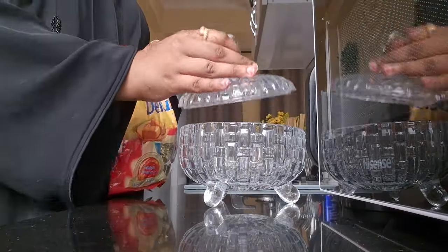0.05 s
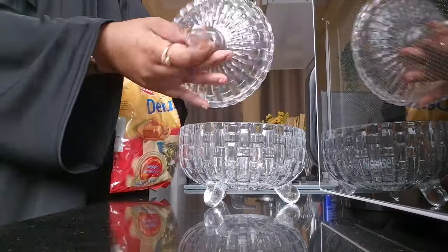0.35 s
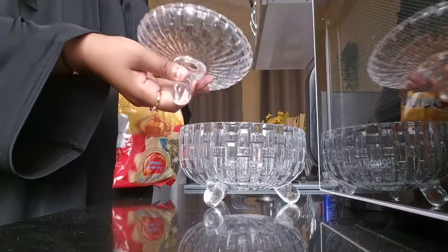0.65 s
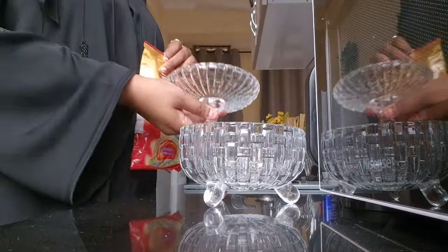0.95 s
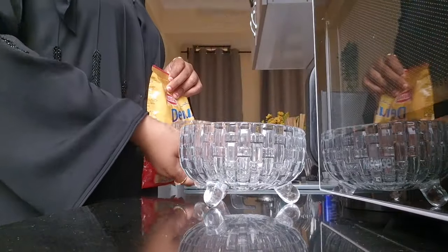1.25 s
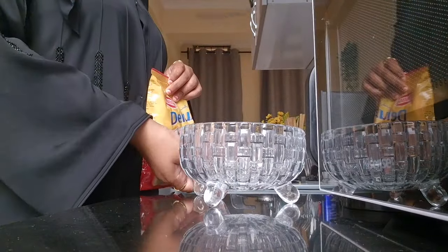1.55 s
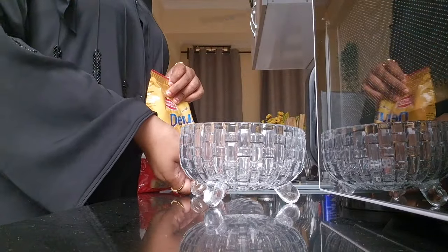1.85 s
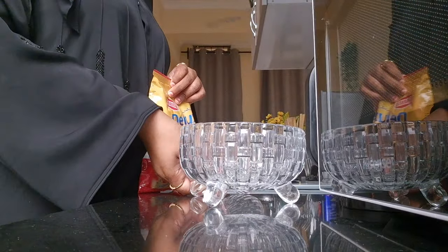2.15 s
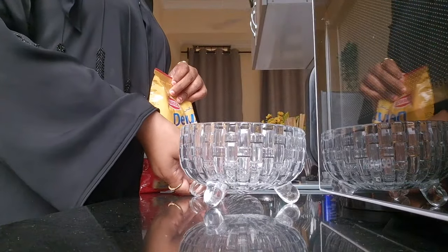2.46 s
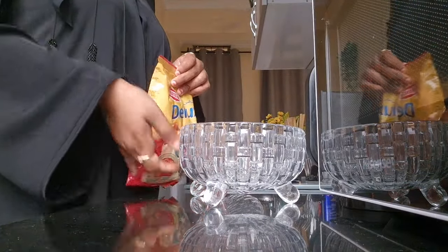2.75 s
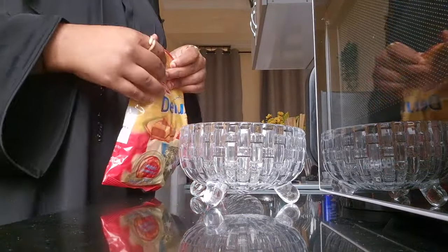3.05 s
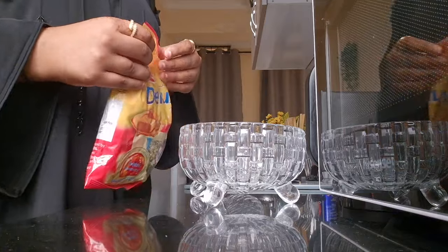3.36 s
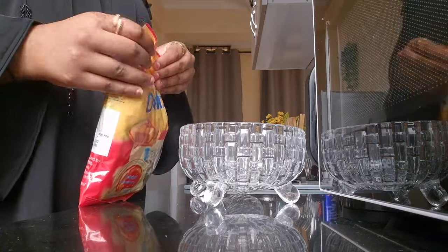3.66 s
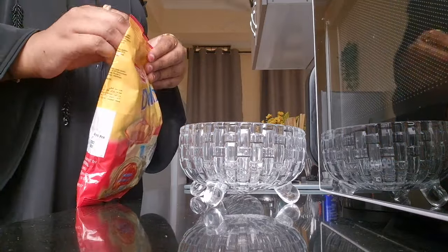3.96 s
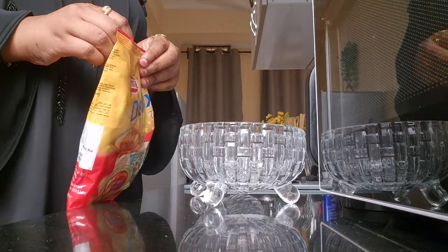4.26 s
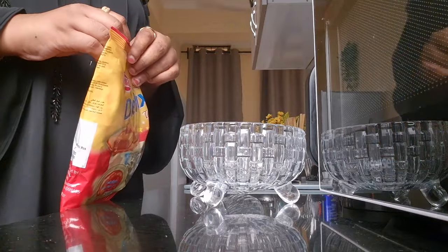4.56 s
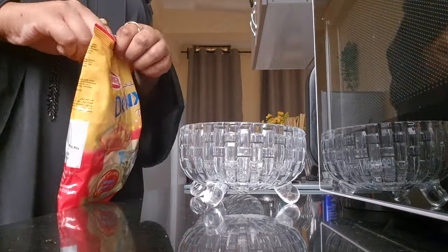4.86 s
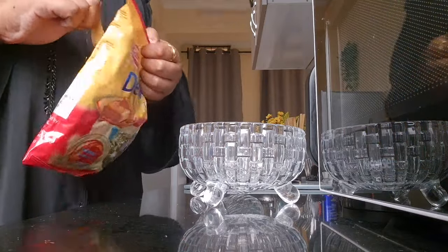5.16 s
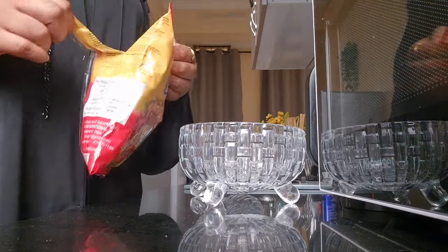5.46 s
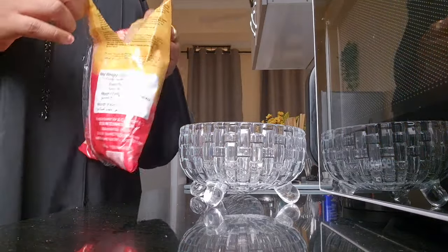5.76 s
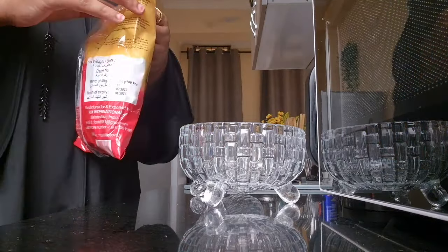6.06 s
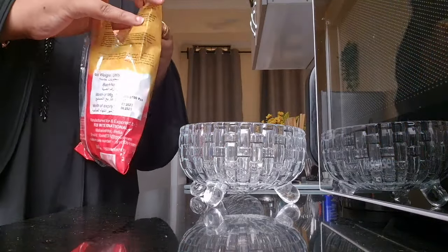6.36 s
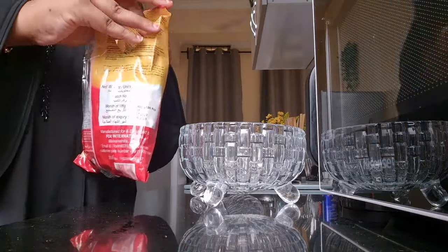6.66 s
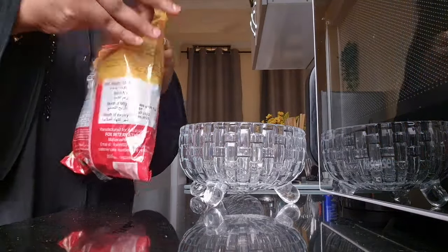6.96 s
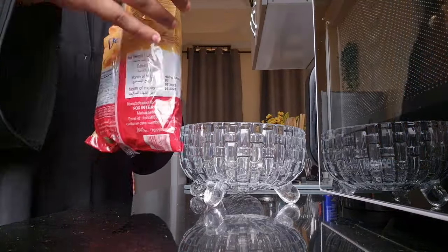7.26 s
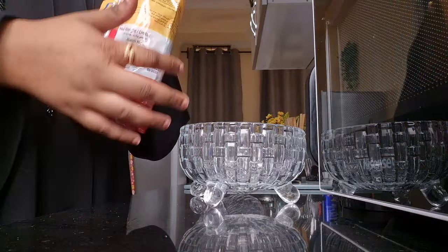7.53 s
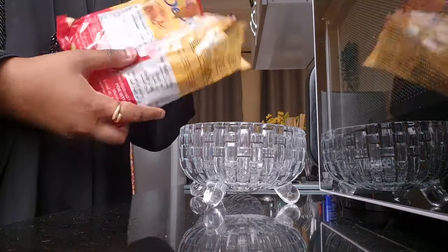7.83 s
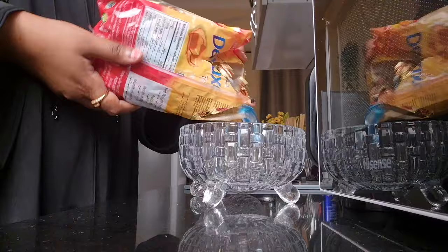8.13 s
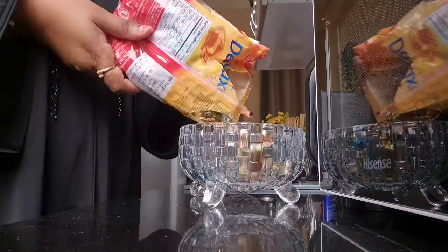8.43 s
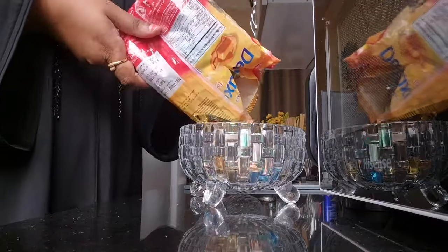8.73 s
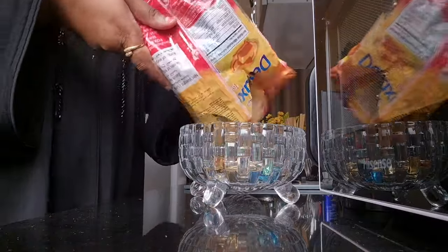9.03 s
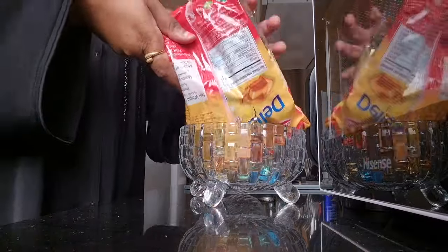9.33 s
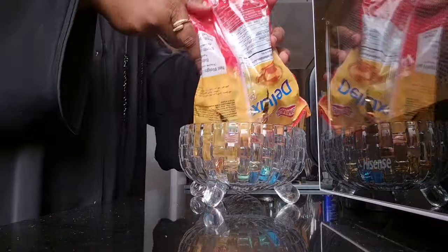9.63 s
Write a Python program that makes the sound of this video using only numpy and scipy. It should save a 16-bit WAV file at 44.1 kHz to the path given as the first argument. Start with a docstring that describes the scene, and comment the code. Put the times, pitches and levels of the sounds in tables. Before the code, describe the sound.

A glass lid clinks down and rocks, then a crinkling plastic bag is torn open and wrapped sweets tumble into a glass bowl.

```python
"""A kitchen with a stone counter, heard from close by. A cut-glass lid is laid upside down, clinks
against its bowl and is left rocking with soft, hollow ticks. A plastic bag is handled and torn open,
crackling as its creases buckle. Hard wrapped sweets slump, clack together and tumble into the glass
bowl, which rings briefly. The room echoes and rumbles low, and a limiter holds down the loudest clink."""
import sys
import numpy as np
from scipy import signal
from scipy.fft import rfft, irfft, next_fast_len
from scipy.io import wavfile
from scipy.ndimage import uniform_filter1d, minimum_filter1d

SR = 44100
rng = np.random.default_rng(int(sys.argv[2]) if len(sys.argv) > 2 else 0)


def transcribe(u):
    """Save the signal u as a 16-bit wav file named by the first command-line argument.

    u: samples, shape (n,) or (channels, n), limited to [-1, 1]; the rate is SR.
    q: integer samples, one column per channel.
    """
    v = np.clip(np.atleast_2d(u).T, -1, 1)
    q = np.round(v * 32767).astype(np.int16)
    wavfile.write(sys.argv[1], SR, q)


N = 431738

# The glass lid's own tones. A ring time (t60) is how long a sound takes to fade by 60 dB.
# (pitch [Hz], ring time [s], level on hitting the counter [dB], level on hitting the bowl [dB])
LID_TONES = [(473, 0.19, -2.5, -5), (1017, 0.048, -13, 5.5), (1131, 0.23, 1.5, -29), (1900, 0.083, 6, -24),
             (2049, 0.64, -13, 3), (2296, 0.32, -15, -14.5), (3900, 0.3, -15.5, -24), (5010, 0.23, -48, -7),
             (5026, 0.24, -48, 1.5), (5085, 0.42, -37, -11.5), (5550, 0.067, 2.5, -7),
             (5610, 0.58, -19.5, -22.5), (8820, 0.22, -45, -10.5), (9240, 0.28, -30, -23),
             (11640, 0.12, -30, -23), (13200, 0.15, -44.5, -23)]
# each hit of the lid: (time [s], thud [dB], clash [dB], ring from counter [dB], ring from bowl [dB])
LID_HITS = [(0.892, -62, -53, -60, -70), (1.348, -20.5, -40, -36, -62), (1.357, -13.5, -30, -16, -60),
            (1.382, -14.5, -33.5, -28, -60), (1.464, -19.5, -44.5, -35.5, -63),
            (1.496, -26, -57, -44.5, -71), (1.9485, -16, -16.5, -27.5, -10), (1.984, -15, -20, -32.5, -18),
            (2.003, -17, -26, -34, -16.5), (2.016, -21.5, -28, -27, -14.5), (2.033, -31, -25, -36, -18.5),
            (2.046, -33, -33, -40, -27.5)]
# tone colour of the lid on stone: (frequency [Hz], level [dB])
THUD_COLOUR = [(70, -24.5), (110, 0.5), (179, -9.5), (290, 4), (443, 4.5), (836, -6), (1150, -2.5),
               (1320, -18), (1510, 1), (1730, -13), (1890, -22), (2100, -11), (2600, -35.5), (5720, -120)]
# tone colour of glass on glass: (frequency [Hz], level [dB])
CLASH_COLOUR = [(2000, -4), (2900, 10.5), (3600, 1), (5200, 8.5), (6300, 6.5), (8000, -12), (9200, -10.5),
                (16000, -28.5)]
# the lid tips over while it still wanders unevenly: (time [s])
UNEVEN_TIPS = [2.244, 2.289, 2.372, 2.51, 2.582, 2.7, 2.769, 2.88, 2.949, 3.024, 3.138, 3.25, 3.341, 3.444,
               3.631, 3.73, 3.906, 4.003, 4.16, 4.26, 4.41, 4.495, 4.638, 4.72, 4.855, 4.94, 5.266, 5.34,
               5.52, 5.587, 5.631, 5.698, 5.801, 5.866, 5.97, 6.04, 6.127]
# tones of the rocking lid: (pitch [Hz], ring time [s], level at first [dB], level near rest [dB])
ROCKING_TONES = [(518, 0.065, -5, -2.5), (721.5, 0.11, -0.5, -3.5), (903, 0.14, -5, 1.5),
                 (1104, 0.075, -3, 3.5), (2274, 0.06, -0.5, -5), (5140, 0.027, -11, -22)]
# loudest creases of the bag and wrappers: (time [s], crisp tick [dB], fuller body [dB])
LOUD_SNAPS = [(2.811, -31.5, -39), (2.997, -39.5, -31), (3.042, -36.5, -35.5), (3.148, -23.5, -27.5),
              (3.198, -27.5, -45), (3.246, -30, -28), (3.507, -32, -33), (3.618, -21, -22.5),
              (3.751, -19, -30), (4.024, -23.5, -31), (4.072, -22, -32), (4.139, -22.5, -32.5),
              (4.269, -27, -22.5), (4.296, -27, -22.5), (4.384, -28, -31), (4.42, -29, -30.5),
              (4.46, -35, -36), (4.528, -26, -37.5), (4.705, -30, -36), (4.717, -16.5, -28),
              (4.848, -29, -30), (4.972, -22, -25), (5.009, -25.5, -43), (5.043, -16, -33),
              (5.223, -30, -28.5), (5.37, -22, -22.5), (5.434, -23, -20.5), (5.458, -17, -24),
              (5.511, -18.5, -33), (5.653, -41, -32.5), (5.724, -26, -43), (5.787, -24, -28),
              (5.979, -40, -28.5), (6.041, -18.5, -31), (6.112, -24, -28.5), (6.174, -40, -31),
              (6.235, -18, -33), (6.279, -21, -24), (6.337, -20, -32), (6.443, -26, -33.5),
              (6.622, -18, -29), (6.643, -29, -19), (6.701, -21, -27), (6.792, -33, -35),
              (6.842, -28.5, -32.5), (6.862, -23.5, -24.5), (6.891, -20, -27), (6.9, -8, -24),
              (6.934, -13.5, -23), (7.097, -20.5, -31.5), (7.138, -35, -26.5), (7.207, -21.5, -24.5),
              (7.33, -26, -25.5), (7.369, -26.5, -19.5), (7.43, -54, -31.5), (7.643, -37, -36.5),
              (7.746, -28.5, -32), (7.88, -21.5, -20), (7.946, -27, -23), (7.966, -31, -28.5),
              (8.044, -34, -24.5), (8.107, -31.5, -25.5), (8.21, -22.5, -21.5), (8.329, -34, -24),
              (8.528, -16.5, -24.5), (8.741, -34.5, -36.5), (8.98, -23, -28.5), (9.067, -24, -19.5),
              (9.148, -18.5, -26), (9.166, -16.5, -25), (9.412, -24, -28.5), (9.513, -25.5, -24),
              (9.673, -26.5, -25), (9.785, -31, -16.5)]
# tone colour of a crease's crisp tick: (frequency [Hz], level [dB])
TICK_COLOUR = [(1530, -50.5), (2600, -0.5), (3370, -3.5), (4170, 1.5), (5520, 5), (7480, -2.5),
               (10900, -13), (14600, -18), (16000, -12.5)]
# tone colour of its body, the flap of the bag around it: (frequency [Hz], level [dB])
FLAP_COLOUR = [(35, -21), (100, -2.5), (250, -2), (400, -1), (620, -4), (820, 1), (1150, -8), (1500, -1.5),
               (2200, -0.5), (2800, -12), (3600, -18.5)]
# The bag is picked up, tugged until it rips and turned over; then the sweets slide out in batches.
# (start [s], length [s], crisp tick [dB], fuller body [dB])
BAG_MOVES = [ (3.192, .14, -33, -36.5), (3.609, .16, -34, -37.5), (3.92, .025, -30, -32),
             (4.05, .14, -33, -36), (4.239, .07, -29, -29.5), (4.822, .04, -33, -33.5),
             (4.971, .26, -34, -30.5), (5.065, .07, -22.5, -24), (5.371, .1, -31, -26.5),
             (5.5, 1.1, -44, -41.5), (5.78, .11, -32, -33.5), (6, .13, -35, -38), (6.245, .08, -32, -40),
             (6.58, .07, -26, -29), (6.858, .07, -31, -39), (6.937, .075, -19, -15.5),
             (7.2, .09, -39, -29.5), (7.81, .08, -33, -27.5), (8.105, .15, -36, -29),
             (8.259, .16, -28.5, -30), (8.478, .08, -31, -34.5), (8.85, .16, -41, -35),
             (9.057, .11, -27, -23.5), (9.2, .15, -37, -35), (9.49, .03, -31, -23), (9.59, .1, -23, -21)]
# sweets knock together in the bag or on the heap: (time [s], level [dB], pitch [Hz])
SWEET_CLACKS = [(3.148, -18, 930), (5.371, -19.5, 696), (5.434, -21.5, 1100), (5.594, -34, 700),
                (6.623, -30, 696), (8.528, -24, 1130), (9.044, -28, 2200), (9.06, -22.5, 1200),
                (9.102, -22.5, 1470), (9.123, -23.5, 1400), (9.147, -20.5, 990), (9.164, -18, 2870),
                (9.241, -26.5, 1450), (9.309, -17, 2490), (9.34, -28, 1290), (9.412, -21.5, 1580),
                (9.55, -24, 1540), (9.594, -14.5, 1180), (9.65, -17, 1287), (9.749, -15, 706)]
# tone colour of a clack: (frequency [Hz], level [dB])
CLACK_COLOUR = [(60, -18), (250, -3.5), (900, 2), (2200, -2), (4200, -7), (7000, -15.5), (14000, -32)]
# sweets land in the bowl: (time [s], level [dB])
SWEET_DROPS = [(8.261, -15), (8.272, -23.5), (8.303, -17.5), (8.335, -26), (8.4, -25.5), (8.479, -21),
               (8.527, -25.5), (8.585, -27), (8.805, -32.5), (9.058, -22), (9.123, -25), (9.164, -25),
               (9.594, -24), (9.649, -22.5), (9.748, -25.5)]
# the bowl's own tones: (pitch [Hz], ring time [s], level [dB])
BOWL_TONES = [(461, 0.12, -17), (674, 0.074, -12), (897, 0.08, 7), (1004, 0.046, -11), (1099, 0.084, 0.5),
              (1518, 0.13, -9)]
# how long the kitchen echoes: (frequency [Hz], ring time [s])
ECHO_TIMES = [(150, 0.64), (1000, 0.29), (5000, 0.34), (15000, 0.28)]
# the surroundings give back little of the highest treble: (frequency [Hz], level [dB])
WALL_COLOUR = [(2000, 0), (5000, 0), (9000, -2), (14000, -5)]
# tone colour of the room's rumble: (frequency [Hz], level [dB])
RUMBLE_COLOUR = [(25, -4), (119, 3), (192, -5.5), (286, 1), (335, -10), (436, -1), (722, -12),
                 (1230, -16.5), (2300, -22.5), (6330, -41.5), (14000, -65.5)]
# the rumble slowly swells and sinks: (time [s], level [dB])
RUMBLE_LEVELS = [(0, -41), (1.3, -40), (2.4, -44.5), (4.5, -44), (7.2, -40.5), (8, -43)]

ROCK_END_S = 8.2  # the lid comes to rest


def lid_clinks(clash_gain_db=3, bounce_loss_db=4, bounce_s=.008, bounces=3):
    """The lid lands and chatters against the bowl; every hit stops the ring of the one before."""
    out, t = np.zeros((2, N)), np.arange(SR) / SR
    hz, t60, counter_db, bowl_db = np.transpose(LID_TONES)
    waits = np.diff([hit[0] for hit in LID_HITS], append=N / SR)
    for (s, thud_db, clash_db, on_counter_db, on_bowl_db), wait in zip(LID_HITS, waits):
        tones_db = 20 * np.log10(np.hypot(amp(counter_db + on_counter_db), amp(bowl_db + on_bowl_db)))
        choke = np.exp(-np.maximum(t - wait, 0) / 0.00097)
        add(out, s, choke * ring(hz, t60, tones_db, vary_db=1.2, spread=1.1, attack_s=0.0019))
        add(out, s, amp(thud_db) * panned(burst(THUD_COLOUR, t60=0.12, alike=0.75), left_db=4))
        for k, delay in enumerate(bounce_s * (np.arange(bounces) + .5 * rng.random(bounces))):
            clash = burst(CLASH_COLOUR, t60=0.033, alike=0.16)
            add(out, s + delay, amp(clash_db + clash_gain_db - k * bounce_loss_db) * clash)
    # at the start, the rim still sings faintly from the lid being lifted off
    add(out, 0, ring([2044], [.75], [-43], vary_db=0, spread=1, attack_s=0.0005))
    return out


def lid_rocking(db=-34.5, uneven_db=2, fade_db=9.5):
    """The upturned lid rocks with soft, hollow ticks, each on another flat face of its knob."""
    out = np.zeros((2, N))
    hz, t60, early_db, late_db = np.transpose(ROCKING_TONES)
    for s in tip_times():
        settled = np.interp(s, [UNEVEN_TIPS[0], ROCK_END_S], [0, 1])
        tones_db = early_db + settled * (late_db - early_db)
        lost_db = np.interp(s, [UNEVEN_TIPS[-1], ROCK_END_S], [0, fade_db])
        tip_db = db - lost_db + uneven_db * rng.uniform(-0.89, 1)
        detuned = hz * (1 + 0.0094 * rng.standard_normal(len(hz)))
        add(out, s, amp(tip_db) * ring(detuned, t60, tones_db, vary_db=2, spread=1, attack_s=0.0026))
        add(out, s, amp(tip_db - 6) * burst(THUD_COLOUR, t60=0.06, alike=0.93))
    return panned(out, left_db=4.5)


def tip_times(first_swing_s=.147, last_swing_s=.12, back_share=0.33):
    """When the lid tips: unevenly at first, then in a limping to and fro that steadily speeds up."""
    t = np.arange(UNEVEN_TIPS[-1], ROCK_END_S, 1 / SR)
    swings_done = np.cumsum(1 / np.linspace(first_swing_s, last_swing_s, len(t))) / SR
    tips = np.arange(swings_done[-1] - 1)[:, None] + [back_share, 1]  # two tips a swing
    return np.concatenate([UNEVEN_TIPS, np.interp(tips.ravel(), swings_done, t)])


def bag_snaps(stage_s=.003, lead_db=-13, follow_db=-9, facet_hz=1700):
    """A big crease gives way in three stages: a small snap, the main one, and another small one."""
    s, crisp_db, body_db = np.transpose(LOUD_SNAPS)
    out = np.zeros((2, N))
    for step, db in [(-1, lead_db), (0, 0), (1, follow_db)]:
        when = s + step * stage_s * (.5 + rng.random(len(s)))
        pitches = facet_hz * np.exp(0.19 * rng.standard_normal(len(s)))
        out += crackle(when, crisp_db - 1.5 + db, body_db - 0.9 + db, pitches, scatter_octaves=0.31)
    return out


def bag_crinkling(count=1100, held_from_s=3, base_hz=1276, octaves_per_db=0.012):
    """A spray of small creases follows the hands and thickens into a rip."""
    t = np.arange(round(held_from_s * SR), N, 64) / SR
    crisp_db, body_db = hand_effort(t)
    # harder work buckles more creases a second; light handling leaves single ticks
    pace = amp(.65 * crisp_db)
    shares = (np.arange(count) + rng.random(count)) / count
    s = np.interp(shares, np.cumsum(pace) / pace.sum(), t)
    size_db = 6 * np.clip(rng.standard_normal(count), -2, 1.5)
    # the fewer the creases, the more of the sound each one carries
    size_db -= 10 * np.log10(np.interp(s, t, pace) / pace.mean())
    facet_hz = base_hz * np.exp(0.64 * np.clip(rng.standard_normal(count), -2, 1))
    # harder work buckles smaller facets, which sound higher
    facet_hz *= 2 ** (octaves_per_db * np.interp(s, t, crisp_db - crisp_db.mean()))
    stiff_db = 5.5 * rng.uniform(-1.14, 1, count)  # some creases mostly tick, others mostly flap
    tick_db = np.interp(s, t, crisp_db) + size_db + stiff_db - 6.5
    flap_db = np.interp(s, t, body_db) + size_db - stiff_db - 7
    return crackle(s, tick_db, flap_db, facet_hz, scatter_octaves=0.74)


def hand_effort(t, rise_s=.005, fall_s=.012, held_crisp_db=-50, held_body_db=-44):
    """Crisp and body levels in dB: each move rises, holds and dies; in between, the held bag stirs."""
    start, length, crisp_db, body_db = np.transpose(BAG_MOVES)[:, :, None]
    shape = np.exp(np.minimum(t - start, 0) / rise_s - np.maximum(t - start - length, 0) / fall_s)
    return [10 * np.log10(np.sum((amp(db) * shape) ** 2, axis=0) + amp(held_db) ** 2)
            for db, held_db in [(crisp_db, held_crisp_db), (body_db, held_body_db)]]


def crackle(s, crisp_db, body_db, facet_hz, scatter_octaves, base_tick_hz=7570, octaves_per_db=0.3):
    """Facets (small flat patches of plastic) buckle: each gives a crisp tick and a flap of the bag."""
    out = np.zeros((2, N))
    # the less body a crease has, the higher it ticks
    octaves = octaves_per_db * (crisp_db - body_db) + scatter_octaves * rng.standard_normal(len(s))
    tick_hz = base_tick_hz * 2 ** np.clip(octaves, -1, 1)
    ticks = clicks(tick_hz, TICK_COLOUR, centre_hz=7000, brighten=.9, decay_s=.0006,
                   flutter=.15, sharpness=2.6, alike=.05, ripple_taps=30)
    flaps = clicks(facet_hz, FLAP_COLOUR, centre_hz=1300, brighten=.6, decay_s=.0013,
                   flutter=.033, sharpness=.96, alike=.49, ripple_taps=70)
    ticks *= amp(crisp_db)[:, None, None]
    flaps *= amp(body_db)[:, None, None]
    for when, sound in zip(s, ticks + panned(flaps, left_db=1.5)):
        add(out, when, sound)
    return out


def clicks(pitch_hz, colour, centre_hz, brighten, decay_s, flutter, sharpness, alike, ripple_taps):
    """One click for each pitch: a tiny kick of noise shakes a facet or a sweet, which rings briefly."""
    size, ripple_db = 512, 4
    t, hz = np.arange(size) / SR, np.fft.rfftfreq(size, 1 / SR)
    count, pitch_hz = len(pitch_hz), pitch_hz[:, None, None]
    stretch, side = np.clip(rng.standard_normal((2, count, 1, 1)), -1.5, 1.5)
    age = t / (decay_s * np.exp(0.54 * stretch))
    # the kick itself, then a weaker flutter that lasts five times as long
    kick = pair((count, size), alike) * (np.exp(-age) + flutter * np.exp(-age / 5))
    width = pitch_hz / sharpness
    resonance = 1j * hz * width / (pitch_hz ** 2 - hz ** 2 + 1j * hz * width)
    # higher clicks are also brighter overall
    tilt = (hz / centre_hz + .1) ** (brighten * np.log(pitch_hz / centre_hz))
    # random bumps in the spectrum give each click its own colour
    bumps = rfft(rng.standard_normal((count, 1, ripple_taps)), size)
    ripple = amp(ripple_db * bumps / np.sqrt(ripple_taps / 2))
    click = coloured(irfft(rfft(kick) * tilt * ripple * (.5 + resonance)), colour)
    placed = click * amp(1.6 * side * [[1], [-1]])
    return normed(placed) * np.sqrt(SR / 250)  # as much energy as 4 ms at level 1


def sweets_clacking(slump_s=6.96, slump_length_s=.062, slump_db=-25.5, slump_hz=420, count=18):
    """Hard sweets strike one another: singly, and as one dull heap that slumps when the bag rips."""
    out = np.zeros((2, N))
    rattle_s, rattle_loss_db = 0.00199, 6.5
    heap = [(slump_s + slump_length_s * (k + rng.random()) / count, slump_db, slump_hz)
            for k in range(count)]
    s, db, hz = np.transpose(list(SWEET_CLACKS) + heap)
    for k in range(2):  # a clack is a quick double hit
        knocks = clicks(hz, CLACK_COLOUR, centre_hz=1500, brighten=.8, decay_s=.0014,
                        flutter=.06, sharpness=2.5, alike=.65, ripple_taps=70)
        for when, level_db, knock in zip(s, db, knocks):
            delay = k * rattle_s * (.5 + rng.random())
            add(out, when + delay, amp(level_db - k * rattle_loss_db) * knock)
    return panned(out, left_db=3)


def sweets_landing(knocks=3, topple_s=.016, topple_loss_db=5):
    """Wrapped sweets knock the bowl and topple; each lands differently and muffles the glass."""
    out = np.zeros((2, N))
    hz, t60, tones_db = np.transpose(BOWL_TONES)
    for s, db in SWEET_DROPS:
        for k in range(knocks):
            when = s + k * topple_s * (.5 + rng.random())
            level_db = db - k * topple_loss_db
            detuned = hz * (1 + 0.019 * rng.standard_normal(len(hz)))
            glass = ring(detuned, t60, tones_db, vary_db=4, spread=0.72, attack_s=0.0029)
            add(out, when, amp(level_db - 6) * glass)
            add(out, when, amp(level_db - 8) * burst(FLAP_COLOUR, t60=0.048, alike=0.28))
    return panned(out, left_db=5)


def room_echo(x, near_db, tail_db, patterns):
    """Counter and oven door echo at once, the walls later; the pattern shifts as things move."""
    out = np.zeros((2, N))
    for part in np.array_split(np.arange(N), patterns):
        hz, t, noise = signal.stft(rng.standard_normal((2, SR // 2)), SR, nperseg=256)
        tail_fade = amp(-60 * t / along(ECHO_TIMES, hz)[:, None])
        tail = normed(signal.istft(noise * tail_fade, SR, nperseg=256)[1])
        near_fade = np.exp(-np.arange(tail.shape[1]) / SR / 0.0038)
        near = normed(rng.standard_normal(tail.shape) * near_fade)
        echo = amp(near_db) * near + amp(tail_db) * tail
        add(out, part[0] / SR + .002, signal.fftconvolve(x[:, part], echo, axes=1))
    return out


def room_rumble():
    """The low, unbroken noise of the kitchen air."""
    air = normed(coloured(pair((N,), alike=0.68), RUMBLE_COLOUR)) * np.sqrt(N)
    level_db = np.interp(np.arange(N) / SR, *np.transpose(RUMBLE_LEVELS))
    return panned(air, left_db=2.5) * amp(level_db)


def ring(hz, t60, db, vary_db, spread, attack_s):
    """Fading tones of struck glass; each reaches the two microphones a little out of step."""
    t = np.arange(SR) / SR
    out = np.zeros((2, SR))
    for f, life, level in zip(hz, t60, db + vary_db * rng.standard_normal(len(hz))):
        age = t[t < 1.3 * life]
        phase = rng.uniform(0, 2 * np.pi) + np.array([[.5], [-.5]]) * spread * min(f / 2000, 1)
        out[:, :len(age)] += amp(level - 60 * age / life) * np.sin(2 * np.pi * f * age + phase)
    return out * (1 - np.exp(-(t / attack_s) ** 2))


def burst(colour, t60, alike):
    """A dying puff of coloured noise that starts at about level 1."""
    t = np.arange(SR // 2) / SR
    fade = amp(-60 * t / t60)
    return normed(coloured(pair(t.shape, alike) * fade, colour)) * np.linalg.norm(fade)


def coloured(x, colour):
    """Give a sound a tone colour, with no ringing ahead of its start (a minimum-phase filter)."""
    n = next_fast_len(x.shape[-1] * 17 // 16, True)
    gain = amp(along(colour, np.fft.rfftfreq(n, 1 / SR)))
    cepstrum = irfft(np.log(gain + 1e-6), n)
    cepstrum[1:n // 2] *= 2
    cepstrum[n // 2 + 1:] = 0
    return irfft(rfft(x, n) * np.exp(rfft(cepstrum)), n)[..., :x.shape[-1]]


def narrowed(x, mono_hz):
    """Low sounds have long waves, which reach both microphones alike."""
    mid, side = (x[0] + x[1]) / 2, (x[0] - x[1]) / 2
    side = signal.sosfilt(signal.butter(1, mono_hz, "high", fs=SR, output="sos"), side)
    return np.array([mid + side, mid - side])


def pair(shape, alike):
    """Left and right noise: unrelated when alike is 0, the same when it is 1."""
    a, b = rng.standard_normal((2, *shape))
    turn = np.arccos(np.clip(alike, -1, 1)) / 2
    shared, apart = np.cos(turn) * a, np.sin(turn) * b
    return np.stack([shared + apart, shared - apart], axis=-2)


def panned(x, left_db):
    """Lean a stereo sound to the left."""
    return x * amp([[left_db / 2], [-left_db / 2]])


def add(track, s, sound):
    """Mix a stereo sound in at s seconds."""
    part = track[:, max(0, round(s * SR)):][:, :sound.shape[1]]
    part += sound[:, :part.shape[1]]


def normed(x):
    """Scale each stereo pair to an average energy of 1 a channel."""
    return x / np.sqrt(np.sum(x ** 2, axis=(-2, -1), keepdims=True) / 2 + 1e-20)


def along(points, hz):
    """Read between (frequency, value) points, giving each octave equal room."""
    frequencies, values = np.transpose(points)
    return np.interp(np.log(hz + 1), np.log(frequencies), values)


def amp(db):
    """Turn decibels into a volume factor."""
    return 10 ** (np.asarray(db) / 20)


def scene():
    """Lid, bag and sweets, with the kitchen's echo and rumble."""
    clinks, air = lid_clinks(), room_rumble()
    bag = bag_snaps() + bag_crinkling() + sweets_clacking()
    clink_echo = room_echo(clinks, near_db=-7, tail_db=-7, patterns=6)
    bag_echo = coloured(room_echo(bag, near_db=-5, tail_db=-6, patterns=18), WALL_COLOUR)
    knocks = sweets_landing() + lid_rocking()
    knock_echo = room_echo(knocks, near_db=-12, tail_db=-10, patterns=12)
    echoes = narrowed(clink_echo + knock_echo + bag_echo, mono_hz=513)
    return clinks + knocks + bag + echoes + air


def record(dry, ceiling=.85, top_hz=16100):
    """A fast limiter turns down the loudest peaks, then the very highest treble is cut away."""
    needed_gain = np.minimum(1, ceiling / (np.abs(dry).max(axis=0) + 1e-9))
    limited = dry * uniform_filter1d(minimum_filter1d(needed_gain, size=300), size=150)
    n = next_fast_len(N + SR // 2)
    edge = np.clip((np.fft.rfftfreq(n, 1 / SR) - top_hz) / 800 + .5, 0, 1)
    return irfft(rfft(limited, n) * np.cos(np.pi / 2 * edge) ** 2, n)[:, :N]


dry = scene()
out = record(dry)
transcribe(out)
```